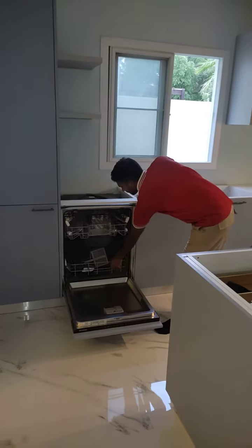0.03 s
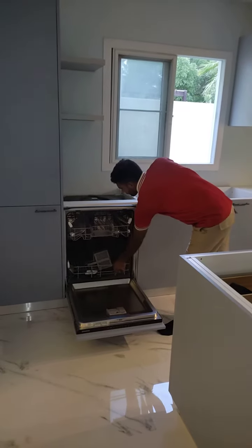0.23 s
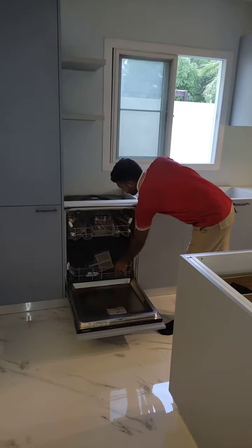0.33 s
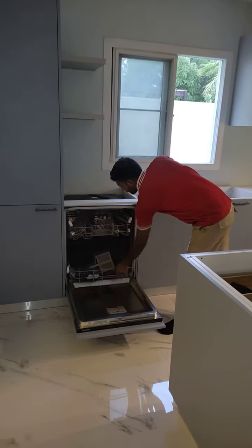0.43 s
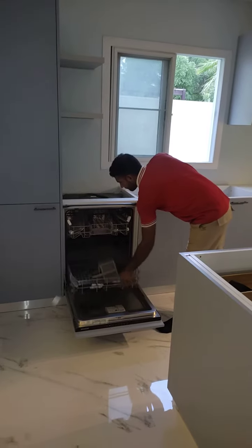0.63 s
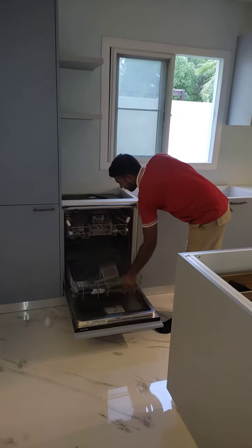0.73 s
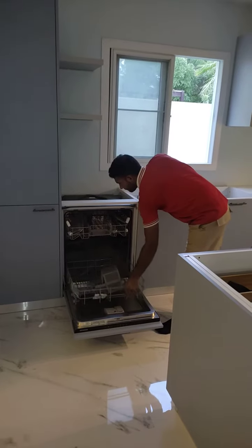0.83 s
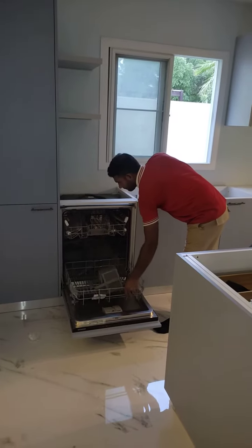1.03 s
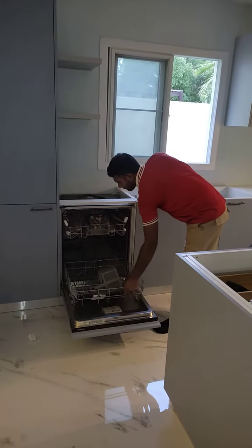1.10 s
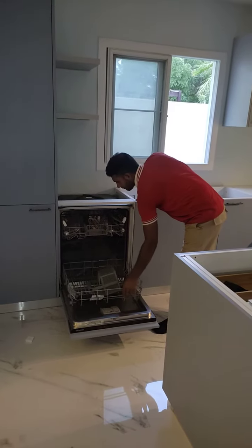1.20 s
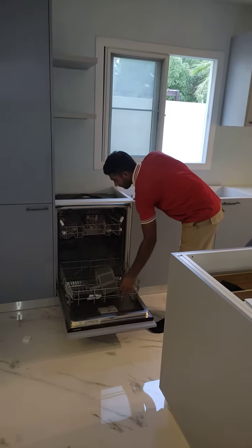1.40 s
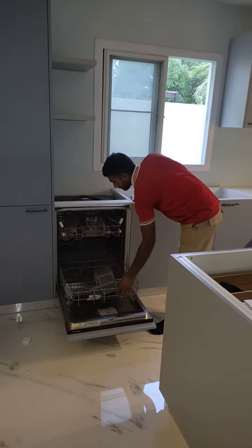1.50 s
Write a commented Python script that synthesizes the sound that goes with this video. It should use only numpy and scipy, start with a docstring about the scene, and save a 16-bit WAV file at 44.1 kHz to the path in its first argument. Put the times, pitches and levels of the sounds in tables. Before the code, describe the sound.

A dishwasher rack starts rolling at about 0.2 seconds with light knocks, a scrape and a brief high squeak. From 0.45 to 0.7 seconds its plastic wheels rattle and clack loudly onto the hollow door, which thuds and rumbles. Around 1.1 seconds it stops with a clack and ringing wire clinks. Faint bumps follow near 1.5 seconds. Everything reverberates in a bare kitchen over low steady noise.

```python
"""A dishwasher's lower wire rack rolls out onto the open door in a bare, tiled kitchen.
Its plastic wheels clack over the hinge gap and rattle, and their bumps drive the modes of the hollow
door into thuds and rumble. Sliding friction along the tub gives a scrape and one brief squeak.
Impacts between the wires excite their high modes, which clink and ring as the rack comes to a stop.
Every contact reverberates in the room, over a low steady noise."""
import sys
import numpy as np
from scipy import signal
from scipy.fft import rfft, irfft
from scipy.io import wavfile

SR = 44100
rng = np.random.default_rng(int(sys.argv[2]) if len(sys.argv) > 2 else 0)


def bounce(signal):
    """Save signal as a 16-bit WAV file at the path given by the first command-line argument."""
    frames = np.transpose(np.atleast_2d(signal))
    limited = np.clip(frames, -1, 1)
    pcm = np.round(limited * 32767).astype(np.int16)
    wavfile.write(sys.argv[1], SR, pcm)


N = 68355


def amp(db):
    """Amplitude ratio of a level in decibels."""
    return 10 ** (np.asarray(db) / 20)


def unit(x):
    """Normalisation to unit energy per channel."""
    return x / np.sqrt(np.sum(x ** 2, -1, keepdims=True) + 1e-20)


def read(points, hz):
    """Interpolation of a table along a logarithmic frequency axis."""
    freq_hz, value = np.transpose(points)
    return np.interp(np.log(hz + 1), np.log(freq_hz), value)


def envelope(table, column=1):
    """Amplitude envelope, linear in decibels between points and silent outside them."""
    table = np.array(table)
    level_db = np.interp(np.arange(N) / SR, table[:, 0], table[:, column], left=-200, right=-200)
    return amp(level_db)


def add(mix, start_s, sound):
    """Superposition of a stereo sound on the mix."""
    part = mix[:, round(start_s * SR):][:, :sound.shape[1]]
    part += sound[:, :part.shape[1]]


def convolve(a, b):
    """Linear filtering by convolution, cut to the length of the scene."""
    return signal.fftconvolve(np.atleast_2d(a), np.atleast_2d(b), axes=1)[:, :N]


def click(spectrum, tilt_db_per_octave=0, size=4096):
    """Minimum-phase pulse of unit energy with a given spectrum, tilted above 300 Hz."""
    hz = abs(np.fft.fftfreq(size, 1 / SR))
    octaves = np.log2(np.maximum(hz, 300) / 1000)
    log_gain = np.log(amp(read(spectrum, hz) + tilt_db_per_octave * octaves))
    response = np.exp(np.conj(signal.hilbert(log_gain)))
    return unit(np.fft.ifft(response).real[:size // 2])


def contacts(per_s, spread_db):
    """Shot noise: a Poisson train of tiny impulses of uneven strength, rms 1."""
    strength = amp(spread_db * np.minimum(rng.exponential(1, N), 4)) * rng.choice([-1, 1], N)
    return unit(strength * (rng.random(N) < per_s / SR)) * np.sqrt(N)


# Likeness of the sound field at left and right: frequency_hz, correlation
COHERENCE = [(60, 0.94), (160, 1), (350, 0.75), (700, 0.32), (1300, 0), (15000, 0.15)]
def cohere(x):
    """Spatial coherence: long waves reach both sides alike, so two noises merge in the bass."""
    common, opposed = rfft(x)
    angle = np.arccos(np.clip(read(COHERENCE, np.fft.rfftfreq(x.shape[1], 1 / SR)), -1, 1)) / 2
    return irfft(common * np.cos(angle) + np.array([opposed, -opposed]) * np.sin(angle), x.shape[1])


def ring(modes, weight_db=lambda hz: 0):
    """Free vibration: damped modes of unit total energy, the high ones out of phase left to right."""
    t, out = np.arange(SR) / SR, np.zeros((2, SR))
    for hz, level_db, t60_s in modes:
        phase_gap = np.arccos(np.clip(read(COHERENCE, hz), -1, 1)) * rng.choice([-1, 1])
        detuned_hz = hz * (1 + .002 * rng.standard_normal())
        phase = 2 * np.pi * detuned_hz * t + phase_gap * np.array([[.5], [-.5]])
        out += amp(level_db + weight_db(hz) - 60 * t / t60_s) * np.sin(phase)
    return unit(out)


# Reverberation time of the tiled kitchen: frequency_hz, t60_s
KITCHEN_DECAY = [(70, 0.2), (250, 0.97), (1000, 0.61), (3000, 0.61), (6000, 0.6), (13000, 0.27)]
def room(direct=.81, wet_db=3.5):
    """Impulse response of one contact: direct sound, brief chatter and a reverberant tail."""
    chatter_db, chatter_t60_s, tail_rise_s = 4.5, .042, .0028
    t = np.arange(SR) / SR
    chatter, tail = rng.choice([-1., 1.], (2, 2, SR)) * (rng.random((2, 2, SR)) < .2)
    chatter = cohere(chatter) * amp(-60 * t / chatter_t60_s)
    hz, frame_s, bands = signal.stft(cohere(tail), SR, nperseg=256)
    bands = bands * amp(-60 * frame_s / read(KITCHEN_DECAY, hz)[:, None])
    tail = signal.istft(bands, SR, nperseg=256)[1][:, :SR] * np.minimum(t / tail_rise_s, 1)
    out = amp(wet_db) * unit(tail) + amp(chatter_db) * unit(chatter)
    out[0, 2] += direct  # arrives two samples later on the left
    out[1, 0] += direct
    return unit(out)


def driven(force, spectrum, modes=None, ring_db=0):
    """Forced vibration: a sustained force radiates into the room and feeds any modes given."""
    radiated = convolve(convolve(force, click(spectrum)), room())
    return radiated + amp(ring_db) * convolve(force, ring(modes)) if modes else radiated


def struck(modes, centre_hz, relative_width, burst_db, ring_db):
    """Band-limited impact: a burst into the room, and free vibration of the modes in its band."""
    def band_db(hz):
        return -20 * np.log10(1 + ((hz / centre_hz - centre_hz / hz) / relative_width) ** 2)
    hz = np.geomspace(20, SR / 2, 300)
    burst = convolve(click(np.c_[hz, band_db(hz)]), room(direct=1.4, wet_db=5.5))[:, :SR]
    return amp(burst_db) * burst + amp(ring_db) * ring(modes, band_db)


# Spectrum of the kitchen's background: frequency_hz, density_db
AMBIENT_SPECTRUM = [(20, -27), (45, -16), (80, -9), (140, -4.5), (230, 0.5), (450, -10), (800, -11.5),
                    (1500, -19.5), (4000, -24), (9000, -39), (13000, -36)]
def room_tone(level_db=-47):
    """Stationary noise, filtered so that the bass dominates."""
    noise = cohere(rng.standard_normal((2, N)))
    return amp(level_db) * irfft(rfft(noise) * rfft(click(AMBIENT_SPECTRUM), N), N)


# Friction of one wire on the rail: time_s, level_db
SQUEAK_LEVELS = [(.27, -52), (.325, -37), (.342, -23.5), (.356, -38), (.375, -64)]
# Resonance of that wire: frequency_hz, density_db
SQUEAK_SPECTRUM = [(1000, -52), (3700, -14), (4250, -8), (4520, 14), (4750, -9), (5100, -34), (12000, -50)]
def wire_squeak():
    """Resonance: the wire selects one narrow band from broadband friction noise."""
    return driven(rng.standard_normal(N) * envelope(SQUEAK_LEVELS), SQUEAK_SPECTRUM)


# Friction of the rack on the tub: time_s, level_db
SCRAPE_LEVELS = [(.235, -45), (.265, -26.5), (.32, -29), (.35, -25), (.39, -26.5), (.425, -37), (.47, -23),
                 (.51, -42), (.59, -51), (.68, -35.5), (.71, -65), (.98, -43), (1.02, -30), (1.09, -36),
                 (1.16, -35.5), (1.3, -48), (1.35, -48)]
# Spectrum of one slip: frequency_hz, density_db
SLIP_SPECTRUM = [(200, -23), (1500, -14.5), (3000, -5), (3500, 1), (4500, 2), (5200, -5.5), (7000, 0),
                 (9800, -6), (12500, 0), (14500, -8)]
# Modes of the rack's wires, shared with the clinks: pitch_hz, level_db, t60_s
WIRE_MODES = [(2972, -4, .35), (3451, 2, .85), (4300, -3, .1), (4511, -5, .5), (4695, 1, .45),
              (5850, -2, .3), (6010, -4, .12), (6767, -3, .45)]
def rack_scrape():
    """Sliding friction: dense, fine slips along the tub hiss and keep the wires ringing."""
    slips = contacts(per_s=5000, spread_db=1) * envelope(SCRAPE_LEVELS)
    return driven(slips, SLIP_SPECTRUM, WIRE_MODES, ring_db=-18.5)


# Wires striking each other: start_s, tick_db, tilt_db_per_octave, ring_db, centre_hz
WIRE_IMPACTS = [(.162, -15, 0, -24, 4500), (.204, -11, 4, -27, 5900), (.676, -7, 2, -22, 7000),
                (.877, -3, 3, -8, 5950), (1.002, -13, 0, -18, 4500), (1.068, -7, -2, -3, 4250),
                (1.107, 2, 2, 2, 5900), (1.13, -2, 1, -7, 6750), (1.242, -14, 0, -9, 4700),
                (1.109, -4, 0, 1, 4700), (1.1195, -2, 1, 4, 4400), (1.122, -9, -1, 2, 3420)]
# Spectrum of one tick: frequency_hz, density_db
TICK_SPECTRUM = [(300, -41), (2000, -8), (3000, 6), (3750, -6), (4500, 13), (5100, -5), (5900, 5),
                 (7500, -2.5), (10000, -7.5), (12500, -1.5), (14500, -5.5)]
def wire_clinks():
    """Impulse excitation: a sharp tick leaves the lightly damped wires ringing."""
    out = np.zeros((2, N))
    for start_s, tick_db, tilt, ring_db, centre_hz in WIRE_IMPACTS:
        tick = convolve(click(TICK_SPECTRUM, tilt), room(direct=.4, wet_db=5))
        ringing = struck(WIRE_MODES, centre_hz, relative_width=.1, burst_db=-4.5, ring_db=-1.5)
        add(out, start_s, amp(tick_db) * tick)
        add(out, start_s, amp(ring_db) * ringing)
    return out


# Bumps that boom in the door and tub: start_s, level_db, centre_hz
DOOR_BUMPS = [(.209, -3, 230), (.365, -6, 730), (.486, 0, 230), (.5, 2, 145), (.525, 4, 280),
              (.552, 5, 265), (.62, 5, 90), (.622, 3, 275), (.86, -3, 130), (.955, -2, 650),
              (1.003, 10, 195), (1.052, 4, 85), (1.064, 0, 600), (1.112, 4, 335), (1.118, 1, 740),
              (1.165, 2, 185), (1.4895, 0, 290), (1.534, -2, 290), (.212, 0, 760), (.617, 6, 860)]
# Modes of the door panel, shared with the rolling: pitch_hz, level_db, t60_s
DOOR_MODES = [(84.2, -2, 0.31), (125.3, -4, 0.98), (161, -6, 0.38), (199.8, 0.5, 0.62), (272.8, 5, 0.41),
              (324.4, -6, 0.9), (442, -2, 0.38), (553.7, 7, 0.3), (732, 2.5, 0.29), (786, 0.5, 0.27),
              (897, 0.5, 0.067)]
def door_thuds():
    """Modal response of a panel: each bump rings the door's modes near its own pitch."""
    out = np.zeros((2, N))
    for start_s, level_db, centre_hz in DOOR_BUMPS:
        thud = struck(DOOR_MODES, centre_hz, relative_width=.38, burst_db=-8, ring_db=-5)
        add(out, start_s, amp(level_db) * thud)
    return out


# Strength of the rolling contacts: time_s, rumble_db, rattle_db
ROLL_LEVELS = [(.17, -50, -57), (.22, -39.5, -35), (.3, -42.5, -48.5), (.35, -37, -38), (.45, -46, -30),
               (.5, -34.5, -22), (.545, -27, -36), (.59, -40.5, -39), (.64, -35, -26), (.72, -34.5, -30.5),
               (.82, -38, -39), (.92, -35, -34), (.99, -30, -33.5), (1.08, -28.5, -26.5), (1.18, -36, -35),
               (1.3, -39.5, -41.5), (1.37, -49.5, -56), (1.47, -48.5, -50)]
# Spectrum of the hollow door's rumble: frequency_hz, density_db
RUMBLE_SPECTRUM = [(30, -48), (55, -13), (80, -5.5), (130, -4), (210, 1), (320, -0.5), (450, -14.5),
                   (720, -8.5), (1100, -32), (3000, -37), (9000, -62)]
# Spectrum of a loose wheel's rattle: frequency_hz, density_db
RATTLE_SPECTRUM = [(100, -35.5), (400, -2.5), (750, 0.5), (1100, 0), (2200, 0), (3300, -4), (4500, -13.5),
                   (5400, -21.5), (9000, -34), (14000, -10)]
def wheels_rolling():
    """Rolling noise: small random bumps drive the door's modes while the loose wheels rattle."""
    bumps = contacts(per_s=440, spread_db=1) * envelope(ROLL_LEVELS, column=1)
    rumble = driven(bumps, RUMBLE_SPECTRUM, DOOR_MODES, ring_db=-10)
    taps = contacts(per_s=700, spread_db=2) * envelope(ROLL_LEVELS, column=2)
    return rumble + driven(taps, RATTLE_SPECTRUM)


# Wheels knocking on the door: start_s, level_db, tilt_db_per_octave
WHEEL_IMPACTS = [(0.1626, -15.5, -5), (0.195, -12.5, -10), (0.209, -11, -3.5), (.323, -1.5, -3.5),
                 (.357, -5.5, -1), (.468, 1.5, -0.5), (.479, 0.5, -2.5), (0.505, -9, -1), (0.6041, 3, -2.5),
                 (0.6087, 7, -0.5), (0.617, 8.5, 1), (.6188, 9, -3.5), (.63, 4.5, 0), (.804, -1.5, -4),
                 (.955, -5.5, 1.5), (1.005, -0.5, 0.5), (1.065, 4, 4), (1.12, 7.5, 8), (1.4902, -16, -4.5),
                 (1.502, -10, -15)]
# Spectrum of one knock: frequency_hz, density_db
CLACK_SPECTRUM = [(60, -26), (300, -21.5), (650, -9.5), (860, -0.5), (1020, -4.5), (1180, 1.5),
                  (1400, -5.5), (1800, 2.5), (2050, -1), (2400, -1.5), (3150, 0.5), (4300, -8.5),
                  (5200, -16.5), (8000, -16.5), (10500, -27.5), (13000, -21)]
def wheel_clacks():
    """Impact noise: hard plastic wheels drop over edges, and each short contact radiates a wide band."""
    out = np.zeros((2, N))
    for start_s, level_db, tilt in WHEEL_IMPACTS:
        add(out, start_s, amp(level_db) * convolve(click(CLACK_SPECTRUM, tilt), room()))
    return out


def scene():
    """Superposition of the rack's sustained sounds, its impacts and the kitchen's background."""
    sustained = rack_scrape() + wheels_rolling() + wire_squeak()
    return sustained + wheel_clacks() + door_thuds() + wire_clinks() + room_tone()


# Balance between the channels: frequency_hz, left_minus_right_db
BALANCE = [(70, 2), (200, -1.5), (600, 1.5), (1500, -2.5), (3000, -4.5), (5000, -6), (7500, -10.5),
           (10000, 1), (13000, 8.5)]
def record(dry):
    """Constant-power panning by frequency, then high-pass and low-pass filtering."""
    low_cut_hz, high_cut_hz = 65, 14300
    ratio = amp(read(BALANCE, np.fft.rfftfreq(2 * N, 1 / SR)))
    gains = np.array([ratio, np.ones_like(ratio)]) / np.sqrt((1 + ratio ** 2) / 2)
    panned = irfft(rfft(dry, 2 * N) * gains)[:, :N]
    high_pass = signal.butter(4, low_cut_hz, "high", fs=SR, output="sos")
    low_pass = signal.firwin(701, high_cut_hz, window=("kaiser", 8), fs=SR)
    return signal.oaconvolve(signal.sosfilt(high_pass, panned), low_pass[None], "same")


dry = scene()
out = record(dry)
bounce(out)
```